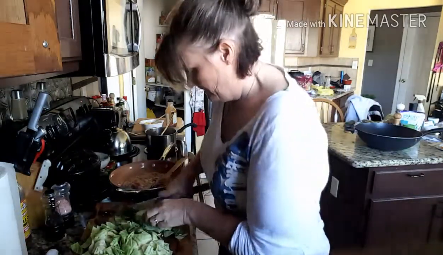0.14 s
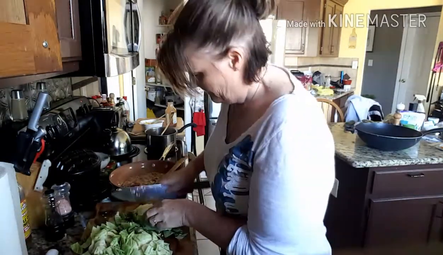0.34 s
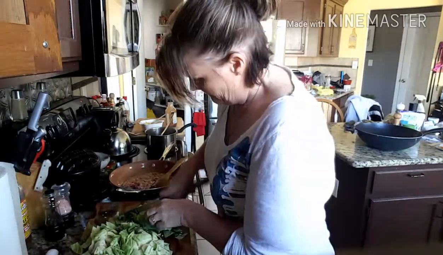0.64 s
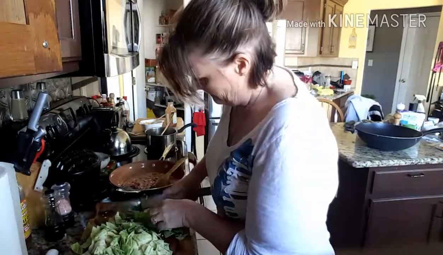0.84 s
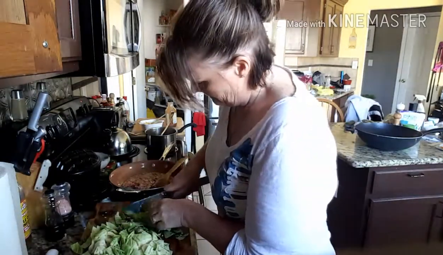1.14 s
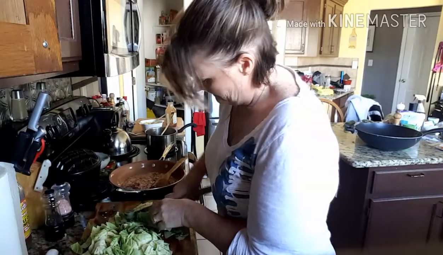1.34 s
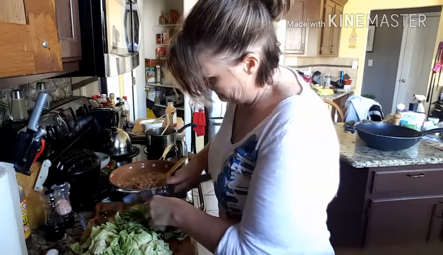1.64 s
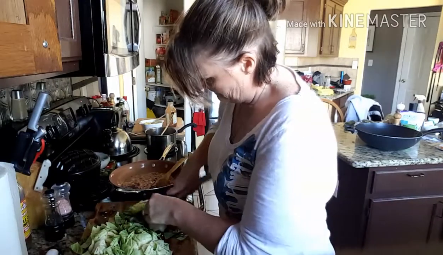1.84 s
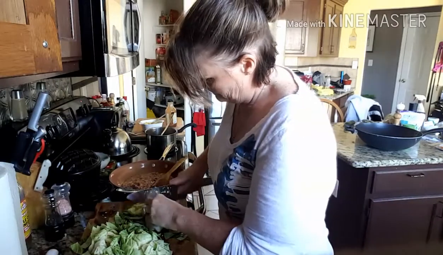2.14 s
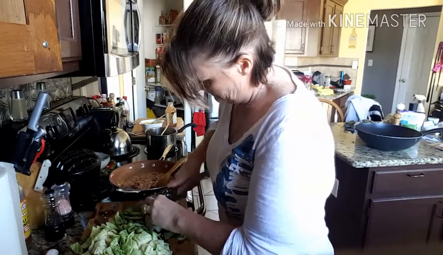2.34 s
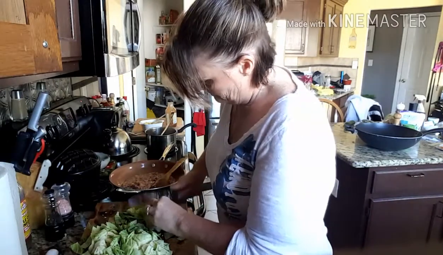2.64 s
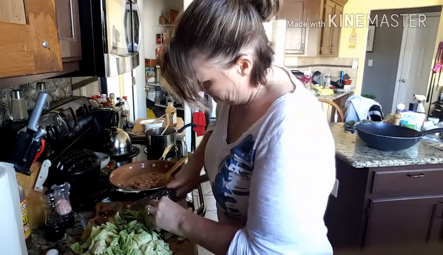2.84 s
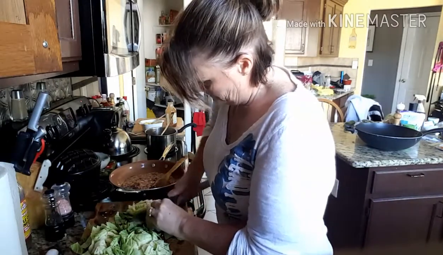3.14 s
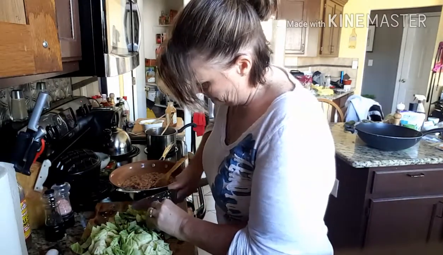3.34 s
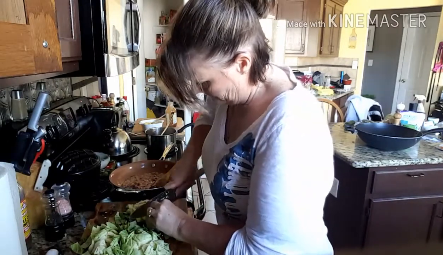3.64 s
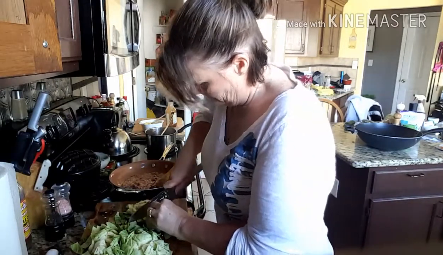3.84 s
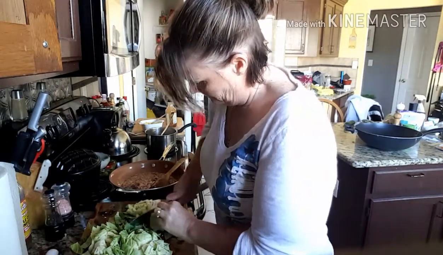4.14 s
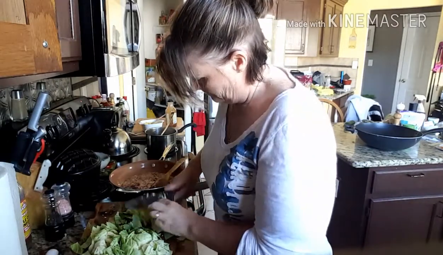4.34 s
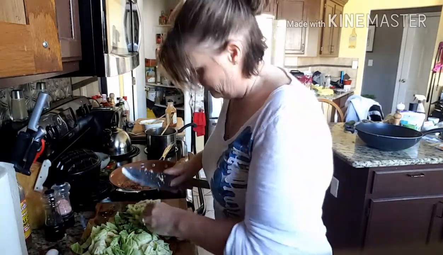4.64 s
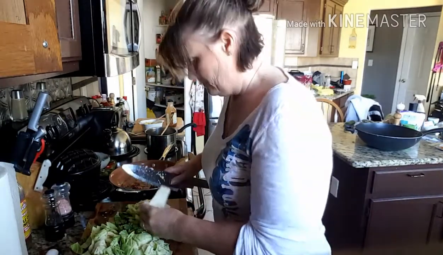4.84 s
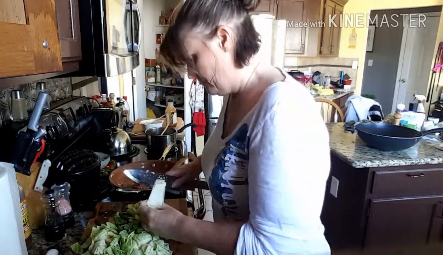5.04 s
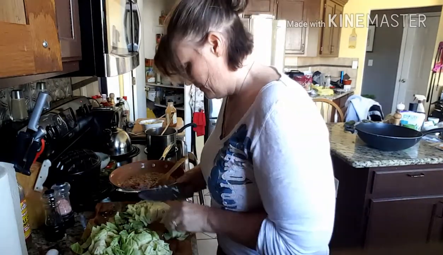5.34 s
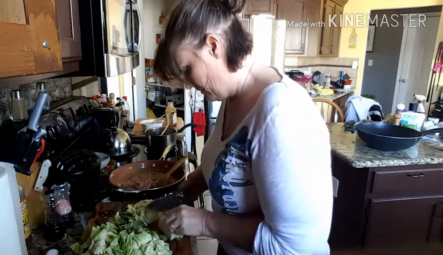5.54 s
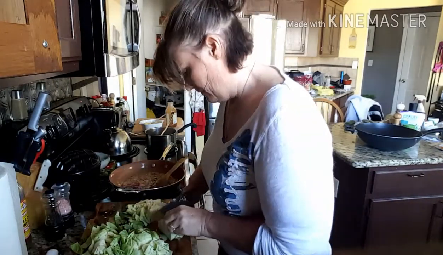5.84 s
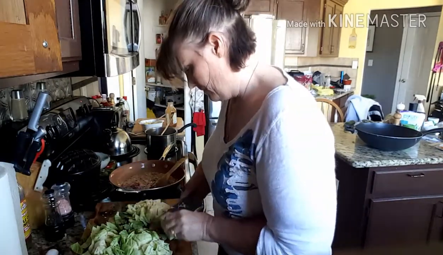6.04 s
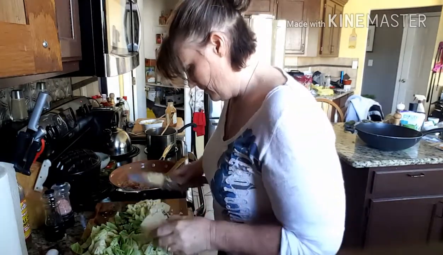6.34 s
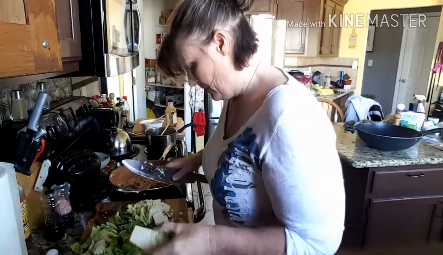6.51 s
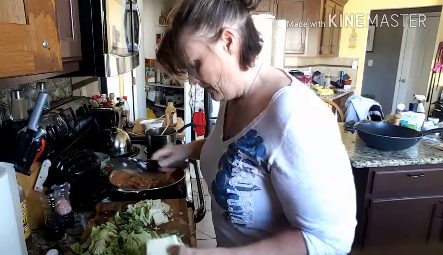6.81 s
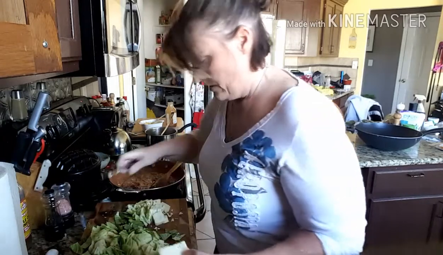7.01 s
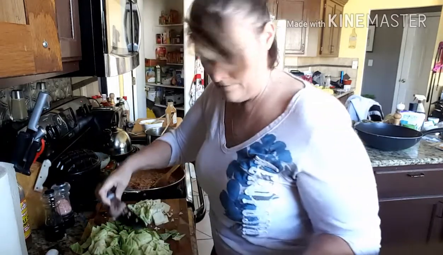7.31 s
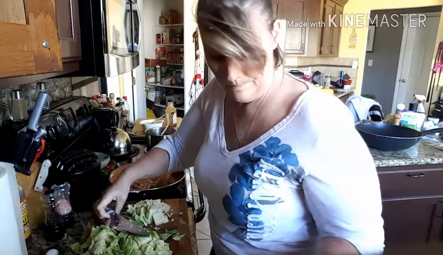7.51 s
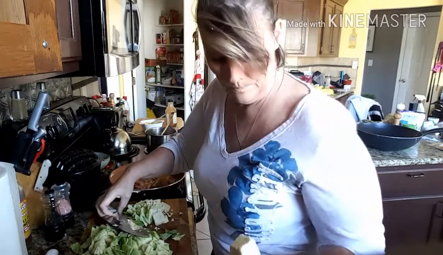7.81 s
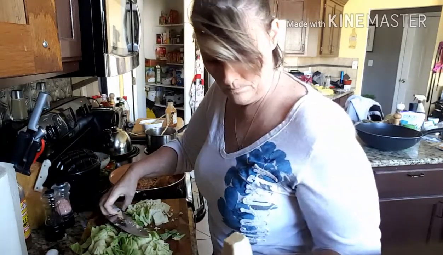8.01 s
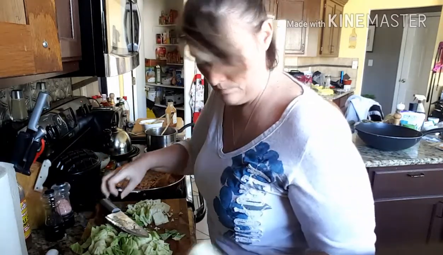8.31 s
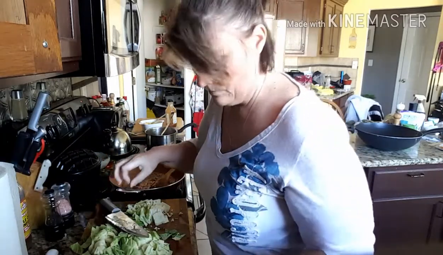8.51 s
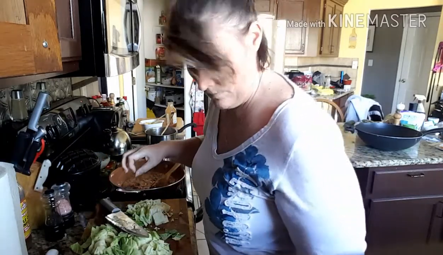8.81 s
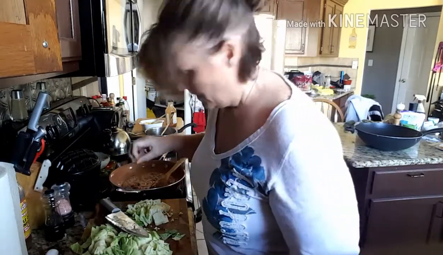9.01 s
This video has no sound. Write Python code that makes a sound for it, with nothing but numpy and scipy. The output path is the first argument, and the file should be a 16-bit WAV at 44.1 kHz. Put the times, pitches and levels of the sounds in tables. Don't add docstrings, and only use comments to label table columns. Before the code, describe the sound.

Six evenly spaced knife chops crunch through cabbage onto wood, then sparser cuts, leafy ticks and handling over faint pan hiss and fridge hum.

```python
import sys
import numpy as np
from scipy import signal
from scipy.fft import rfft, irfft, next_fast_len
from scipy.io import wavfile
from scipy.ndimage import uniform_filter1d, minimum_filter1d

SR = 44100
rng = np.random.default_rng(int(sys.argv[2]) if len(sys.argv) > 2 else 0)


def to_linear_factor(level_db):
    exponent = np.asarray(level_db, float) / 20
    return 10 ** exponent


def materialize(psi):
    bounded = np.clip(np.atleast_2d(psi).T, -1, 1)
    quanta = np.round(bounded * 32767).astype(np.int16)
    wavfile.write(sys.argv[1], SR, quanta)


N = 403956
SIZE = next_fast_len(N + SR)
HZ = np.maximum(np.fft.rfftfreq(SIZE, 1 / SR), 1)

# mode_hz, level_db, t60_s
BOARD_MODES = [(249.4, -28.5, 0.18), (342.4, -19.5, 0.33), (573, -57, 0.018), (601, -5, 0.037),
               (825, -36, .03), (951, -2.5, 0.04), (1023, 1, 0.029), (1550, -2, 0.051), (1604, 3, 0.03),
               (1946, -8, 0.023), (2133, 4, 0.015), (2290, -6, 0.014), (2746, 2, 0.0052), (3400, -25, 0.06),
               (4540, -27, 0.0064)]
# mode_hz, level_db, t60_s
COUNTER_MODES = [(98, -1, 0.067), (119, -7.5, 0.054), (62, -27, 0.087)]


def chops():
    # start_s, knock_db, and relative to it low_modes_db, high_modes_db, top_modes_db
    full_chops = [
        (0.117, -11, -9, -6.5, -7),
        (0.712, -5, -4.5, -6.5, -6),
        (1.285, -2, -6, -4, -2.5),
        (1.889, -3.5, -4.5, 0, -3),
        (2.453, -7, 9, 4, -4),
        (3.015, -8, 1, 5.5, 7),
        (3.993, -9, -7, -3, 1),
        (5.977, -5.5, 5, -6, -3),
        (9.056, -31, 0, -2, 12),
    ]
    # start_s, knock_db, low_modes_db, high_modes_db, top_modes_db
    light_taps = [(0.23, -39.5, 15, 10, -15), (1.868, -34.5, -14, 13, 11), (3.606, -38, 4, -40, 0),
                  (3.713, -44, 4, -12, 11), (4.506, -55.5, 0, 14, 8), (4.882, -50, 13, 4, 0),
                  (6.28, -40, 0, 12, -3), (7.081, -44.5, -1, -21, 0), (7.179, -43.5, -8, -19, -2),
                  (7.58, -22, 6, 6.5, -35), (7.834, -49, 6, 11, 16), (8.457, -38, -14, 0, -3)]
    group_hz = [580, 950, 1900, 3400]

    rows = [(*row, -26.5 + 0.38 * row[1]) for row in full_chops]
    rows += [(*row, -27 + row[1]) for row in light_taps]
    s, knock_db, low_db, high_db, top_db, thump_db = np.transpose(sorted(rows))
    spots = np.transpose([low_db, 0 * s, high_db, top_db])
    mode_hz = np.array(BOARD_MODES)[:, 0]
    spot_db = [np.interp(np.log(mode_hz), np.log(group_hz), spot) for spot in spots]
    chance_db = 1.5 * rng.standard_normal((len(s), len(BOARD_MODES)))
    mode_gains = -to_linear_factor(knock_db[:, None] - 3.5 + spot_db + chance_db)
    knock = strike(BOARD_MODES, s, mode_gains, contact_ms=0.056)
    add_splinters(knock, s, knock_db, spots, group_hz)
    knock = cut(knock, 3420, "low", order=4)

    thump_gains = -to_linear_factor(thump_db[:, None] + 3.0) * np.ones(len(COUNTER_MODES))
    thump = strike(COUNTER_MODES, s + 0.0069, thump_gains, contact_ms=0.52)
    body = cut(knock, 387, "high", order=4)
    bass = cut(cut(knock, 437, "low", order=4), 129, "high", order=4)
    return body + to_linear_factor(-11.0) * bass, thump


def add_splinters(knock, starts_s, knock_db, spots, group_hz):
    # frequency_hz, level_db
    crack_spectrum = [(240, -27), (400, -23), (884, 7), (1380, 5.5), (2510, -16), (3180, -13), (6000, -21),
                      (7800, -70), (13200, -120)]
    hz = np.maximum(np.fft.rfftfreq(4096, 1 / SR), 1)
    t = np.arange(1500) / SR
    splinters = rms_one(colour(rng.standard_normal(N), to_linear_factor(at_hz(crack_spectrum))))
    for i, level_db, spot in zip((starts_s * SR).astype(int), knock_db, spots):
        envelope = to_linear_factor(level_db + 4.0 - 60 * t / 0.02) * np.minimum(t / 0.00034, 1)
        burst = splinters[i:i + 1500] * envelope
        shade = to_linear_factor(np.interp(np.log(hz), np.log(group_hz), spot))
        knock[i:i + 1500] += irfft(rfft(burst, 4096) * shade)[:1500]


def strike(modes, times, gains, contact_ms):
    out = np.zeros(N)
    t = np.arange(SR // 3) / SR
    hz, level_db, t60 = np.transpose(modes)
    rings = to_linear_factor(level_db - 60 * t[:, None] / t60) * np.sin(2 * np.pi * hz * t[:, None])
    push = np.exp(-np.arange(400) / SR / (contact_ms / 1000))
    push = np.convolve(push, push)
    push = push / push.sum()
    for s, gain in zip(times, gains):
        i = round(s * SR)
        sound = signal.fftconvolve(rings @ gain, push)[:N - i]
        out[i:i + len(sound)] += sound
    return out


def leaves():
    # start_s (full pressure), held_s, crunch_db, scrape_db (just after)
    strokes = [(0.07, 0.076, -54.5, -52), (0.708, 0.0016, -41.5, -39), (1.12, 0.002, -76, -74),
               (1.27, 0.011, -41.5, -43), (1.86, 0.035, -43.5, -43), (2.04, 0.002, -52, -64),
               (2.4, 0.002, -63, -67), (2.45, 0.003, -42.5, -41), (2.81, 0.043, -56.5, -84),
               (2.981, 0.037, -42.5, -50), (3.57, 0.02, -61, -78), (3.946, 0.032, -39, -43),
               (4.28, 0.002, -70, -85), (5.13, 0.0088, -56.5, -78), (5.36, 0.27, -63, -72),
               (5.96, 0.012, -44.5, -43.5), (6.22, 0.08, -54.5, -67), (6.52, 0.31, -61.5, -62),
               (6.99, 0.05, -72, -74), (7.24, 0.002, -75, -71), (7.831, 0.0059, -57, -50),
               (7.9, 0.045, -62, -52), (8.47, 0.002, -75.5, -72), (9.13, 0.022, -64, -44)]
    # frequency_hz, level_db (per Hz)
    crunch_spectrum = [(290, -10), (500, 0), (919, -3.5), (1050, -4.5), (2130, 0.5), (2650, -2),
                       (11300, -11), (15100, -10), (16000, -80)]
    # frequency_hz, level_db (per Hz)
    scrape_spectrum = [(180, -38), (300, 7.5), (508, 2), (628, 1.5), (1330, 6), (1990, -2.5), (6000, -107),
                       (7800, -64), (13200, -120)]

    s, held, crunch_db, scrape_db = np.transpose(strokes)
    crunch = pressure(s, held, crunch_db, rise_db=447, fall_db=224)
    crunch += pressure(s, held, crunch_db - 31, rise_db=447, fall_db=65)
    scrape = pressure(s + held + 0.025, 0 * s, scrape_db, rise_db=330, fall_db=154)
    crunch += to_linear_factor(-68.5)
    scrape += to_linear_factor(-68)
    crisp = rms_one(colour(grains(per_s=6000, spread_db=3), to_linear_factor(at_hz(crunch_spectrum))))
    rough = rms_one(colour(grains(per_s=870, spread_db=1), to_linear_factor(at_hz(scrape_spectrum))))
    return to_linear_factor(1.5) * crunch * crisp + scrape * rough + leaf_bursts()


def leaf_bursts():
    # start_s, level_db, centre_hz, length_s
    rib_snaps = [(0.1, -20.5, 2300, 0.049), (0.139, -15.5, 2220, 0.03), (0.694, -20, 2830, 0.048),
                 (1.114, -27, 2480, 0.043), (1.759, -29, 3410, 0.027), (1.837, -46, 3400, 0.04),
                 (1.8604, -22, 3260, 0.035), (2.0195, -26, 2270, 0.023), (2.272, -29.5, 2250, 0.032),
                 (2.382, -24, 2420, 0.055), (2.431, -18, 2310, 0.036), (2.761, -21, 3520, 0.048),
                 (2.972, -19.5, 3750, 0.036), (2.9952, -16, 2340, 0.064), (3.413, -31, 3230, 0.027),
                 (3.546, -25, 2600, 0.026), (3.8817, -22.5, 4400, 0.026), (3.938, -32, 2440, 0.06),
                 (3.972, -16.5, 3700, 0.053), (4.4895, -32, 3400, 0.04), (4.899, -32.5, 3800, 0.024),
                 (5.513, -33, 3890, 0.04), (5.593, -32, 3200, 0.068), (5.948, -40, 3320, 0.039),
                 (6.2764, -15.5, 4300, 0.03), (6.633, -27, 3400, 0.051), (6.925, -29.5, 2270, 0.035),
                 (7.832, -31, 2390, 0.027), (7.995, -33.5, 3260, 0.043), (8.883, -31, 2240, 0.052)]
    # start_s, level_db, centre_hz, length_s
    edge_ticks = [(0.44, -31, 2600, 0.032), (0.568, -24.5, 2800, 0.023), (2.724, -32, 6600, 0.03),
                  (4.2, -36, 7150, 0.036), (4.261, -30.5, 7000, 0.034), (4.692, -31, 11300, 0.034),
                  (4.829, -37, 8890, 0.033), (5.114, -28, 6800, 0.1), (5.327, -29.5, 2840, 0.032),
                  (5.4095, -36, 7550, 0.074), (6.21, -28.5, 6850, 0.053), (6.296, -29, 7500, 0.044),
                  (4.127, -36, 6500, .02), (8.462, -25.5, 7900, 0.017), (7.832, -36, 6250, 0.034),
                  (6.681, -31, 6100, 0.091), (7.005, -29, 6040, 0.052), (7.236, -30, 6000, 0.04),
                  (9.055, -13.5, 5450, 0.023)]
    # start_s, level_db, centre_hz, length_s
    rib_cracks = [
        (1.253, -21, 2620, 0.062),
        (1.8685, -8.5, 2940, 0.013),
        (4.752, -22.5, 6300, 0.011),
        (5.468, -30, 6630, 0.052),
        (8.455, -24, 1760, 0.027),
    ]
    kinds = [(rib_snaps, 1.74, .22), (edge_ticks, 0.97, .2), (rib_cracks, 0.83, .02)]

    out = np.zeros(N)
    source = grains(per_s=9000, spread_db=3)
    hz = np.maximum(np.fft.rfftfreq(8192, 1 / SR), 100)
    t = np.arange(4096) / SR
    for rows, octaves, rise_share in kinds:
        for s, level_db, centre_hz, length in rows:
            i = round((s - 0.0025) * SR)
            envelope = to_linear_factor(level_db - 6.0 - 30 * t / length) * np.minimum(t / (rise_share * length), 1)
            burst = np.resize(source[i:i + 4096], 4096) * envelope
            band = to_linear_factor(-6 * (np.log2(hz / centre_hz) / octaves) ** 2)
            out[i:i + 4096] += irfft(rfft(burst, 8192) * band)[:min(4096, N - i)]
    return out


def grains(per_s, spread_db):
    sizes = to_linear_factor(spread_db * np.minimum(rng.exponential(1, N), 5)) * rng.choice([-1, 1], N)
    return rms_one(sizes * (rng.random(N) < per_s / SR))


def pressure(s, held, level_db, rise_db, fall_db):
    t = np.arange(0, N, 32) / SR
    late = t - s[:, None]
    rise = rise_db * np.minimum(late, 0)
    fall = fall_db * np.maximum(late - held[:, None], 0)
    gain = to_linear_factor(level_db[:, None] + rise - fall)
    return np.interp(np.arange(N) / SR, t, np.sqrt((gain ** 2).sum(axis=0)))


def pile(x):
    scatter = rfft(rng.standard_normal((2, 256)) * to_linear_factor(-40 * np.arange(256) / 256))
    return signal.fftconvolve(x[None], irfft(scatter / np.abs(scatter)), axes=1)[:, :N]


def thumps():
    # start_s, thump_db, knock_db
    soft_blows = [(0.572, -19, -27), (0.859, -31.5, -52), (1.126, -17, -30.5), (2.127, -41, -52),
                  (2.295, -32, -58), (2.4, -31, -61), (2.857, -30.5, -60), (3.186, -34, -36.5),
                  (3.86, -43, -60), (5.46, -23.5, -43.5), (5.916, -32, -50), (6.275, -36, -41),
                  (8.874, -26.5, -39), (8.89, -27, -27), (8.908, -33, -31)]
    s, thump_db, knock_db = np.transpose(soft_blows)
    chance_db = 7.6 * rng.standard_normal((len(s), len(BOARD_MODES)))
    knock = strike(BOARD_MODES, s, to_linear_factor(knock_db[:, None] + 3.5 + chance_db), contact_ms=0.29)
    knock = cut(cut(knock, 626, "low", order=4), 370, "high", order=2)
    thump_gains = to_linear_factor(thump_db[:, None] + 0.5) * np.ones(len(COUNTER_MODES))
    return knock, strike(COUNTER_MODES, s + 0.0019, thump_gains, contact_ms=1.56)


def kitchen(x):
    # late_s, left_db, right_db
    reflections = [(.0075, -4, -14), (.0016, -16, -7), (.0110, -16, -16)]
    # band_hz, t60_s, level_db
    tail_bands = [(89, 0.46, 3.5), (241, 0.33, 8), (481.5, 0.37, 4.5), (846, 0.39, 4), (1412, 0.42, 0),
                  (2340, 0.41, 1.5), (3670, 0.51, -4), (7800, 0.44, -2), (14000, 0.32, -15)]
    t = np.arange(int(.7 * SR)) / SR
    white = stereo(*rng.standard_normal((2, N)))[:, :len(t)]
    response = np.zeros((2, len(t)))
    response[:, 0] = 1
    for late, left_db, right_db in reflections:
        response[:, round(late * SR)] += to_linear_factor([left_db, right_db])
    for hz, t60, level_db in tail_bands:
        edges_hz = [hz / 1.45, min(hz * 1.45, .45 * SR)]
        band = signal.butter(2, edges_hz, "band", fs=SR, output="sos")
        onset = 1 - np.exp(-t / (0.0037 + 0.7 / hz))
        tail = signal.sosfilt(band, white) * to_linear_factor(-60 * t / t60) * onset
        response += to_linear_factor(level_db) * tail * np.sqrt(8 / (t60 * SR))
    return colour(x, rfft(response, SIZE))


def air():
    # frequency_hz, level_db (per Hz)
    hiss_spectrum = [(12, -60), (20, -25), (27, -16), (45, -7.5), (109, 1), (185, -17), (265, -14),
                     (380, -15), (462, -11), (644, -14), (828, -15.5), (1160, -17), (1900, -15),
                     (3320, -20), (15300, -24)]
    # time_s, level_db
    hiss_level = [(0.0, -49.5), (9.16, -51.5)]
    # centre_hz, width_hz, level_db
    hum_modes = [(100, 12, -70.5), (223, 30, -69), (265.3, 14.6, -69.5), (468.5, 14, -65), (593, 11, -70.5),
                 (836, 93, -90)]
    level_db = np.interp(np.arange(N) / SR, *np.transpose(hiss_level))
    noise = stereo(*rng.standard_normal((2, N)))
    hiss = to_linear_factor(level_db) * rms_one(colour(noise, to_linear_factor(at_hz(hiss_spectrum))))
    peaks = np.zeros(len(HZ))
    for hz, width, db in hum_modes:
        peaks += to_linear_factor(db) / np.sqrt(width) / (1 + ((HZ - hz) / width * 2) ** 2)
    return hiss + colour(stereo(*rng.standard_normal((2, N))), peaks * np.sqrt(SR / 2))


def stereo(mid, side):
    # frequency_hz, likeness (0 to 1)
    coherence = [(60, .995), (250, .92), (350, .3), (480, .93), (700, .8), (950, .25), (1900, .45),
                 (4000, .25), (12000, .1)]
    alike = at_hz(coherence)
    return colour(mid, np.sqrt(1 + alike)) + colour(side, np.sqrt(1 - alike)) * [[1], [-1]]


def at_hz(rows, column=1):
    return np.interp(np.log(HZ), np.log(np.array(rows)[:, 0]), np.array(rows)[:, column])


def colour(x, gain):
    return irfft(rfft(x, SIZE) * gain, SIZE)[..., :N]


def cut(x, hz, kind, order):
    return signal.sosfilt(signal.butter(order, hz, kind, fs=SR, output="sos"), x + 1e-18)


def rms_one(x):
    return x / np.sqrt(np.mean(x ** 2) + 1e-20)


def scene():
    knock, thump = chops()
    soft_knock, soft_thump = thumps()
    thump = cut(thump + soft_thump, 96.6, "high", order=3)
    crackle = leaves()
    airborne = knock + soft_knock + .3 * crackle + .95 * pile(crackle)
    room_bass = kitchen(thump).mean(axis=0)
    return kitchen(airborne) + thump + to_linear_factor(-0.5) * room_bass + air()


def band_limit(x):
    return signal.sosfilt(signal.butter(12, 16470, fs=SR, output="sos"), x)


def record(dry):
    # frequency_hz, left_db, right_db
    port_response = [(60, 0, 0), (180, 0, 0), (260, -1, 3), (370, 0, -4), (480, 0, 0), (620, -4, 3),
                     (850, -1, 3), (1080, -1.5, -6), (1330, -2, -2), (2000, -5, 3.5), (3700, 0, -1),
                     (6000, -2, 3), (8200, -15, -1), (9800, -19, 0), (13500, -9, -1.5)]
    port_db = np.array([at_hz(port_response, column=1), at_hz(port_response, column=2)])
    fold = np.where(np.arange(SIZE) < SIZE // 2, 2., 0.)
    fold[0] = 1
    ports = np.exp(rfft(irfft(np.log(to_linear_factor(port_db)), SIZE) * fold))
    delay_s = 24 / SR / (1 + (1050 / HZ) ** 8)
    ports[1] *= np.exp(-2j * np.pi * HZ * delay_s)
    heard = cut(colour(dry, ports), 15350, "low", order=40)
    envelope = np.abs(signal.hilbert(heard, SIZE)[:, :N]).max(axis=0)
    limit = np.minimum(1, .93 / (envelope + 1e-9))
    heard = heard * uniform_filter1d(minimum_filter1d(limit, size=201), size=101)
    return band_limit(heard)


dry = scene()
out = record(dry)
materialize(out)
```